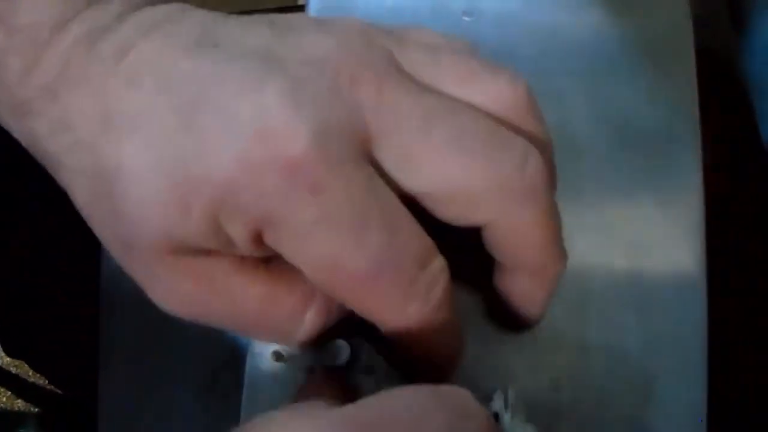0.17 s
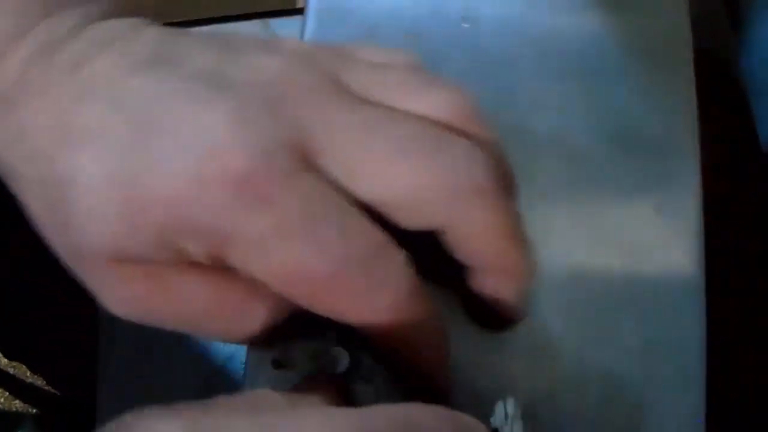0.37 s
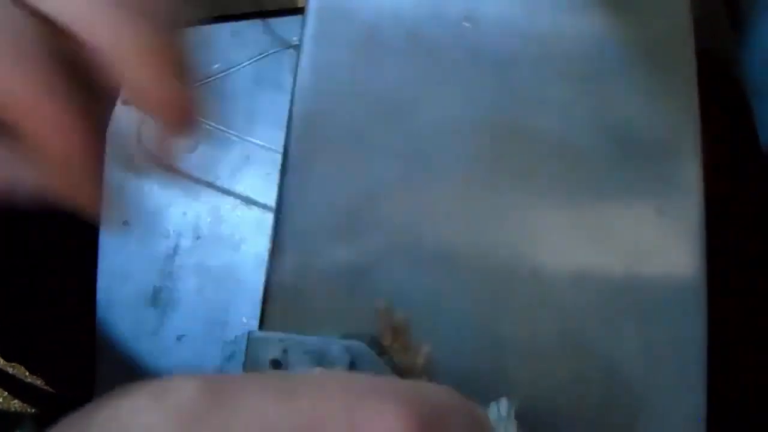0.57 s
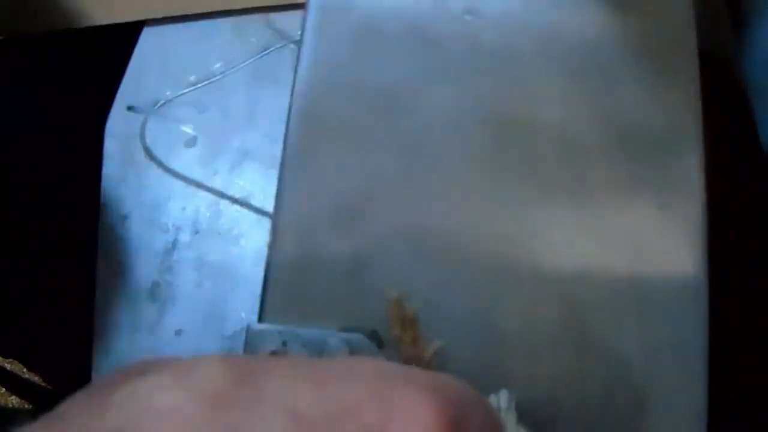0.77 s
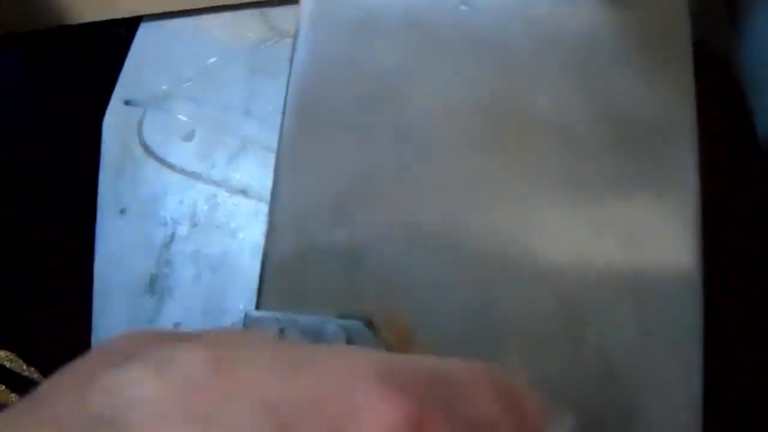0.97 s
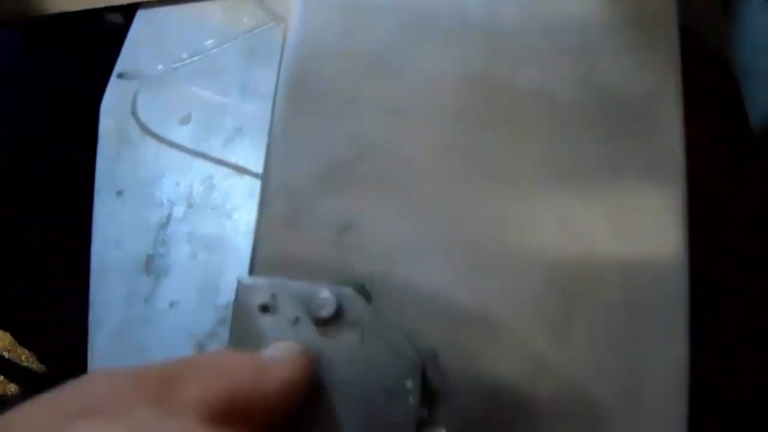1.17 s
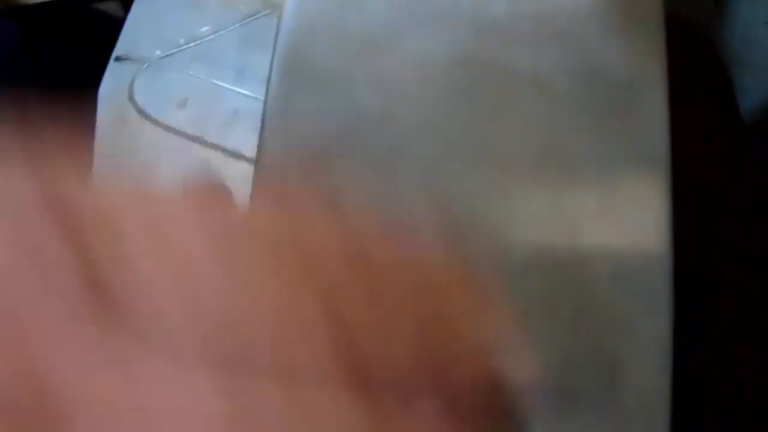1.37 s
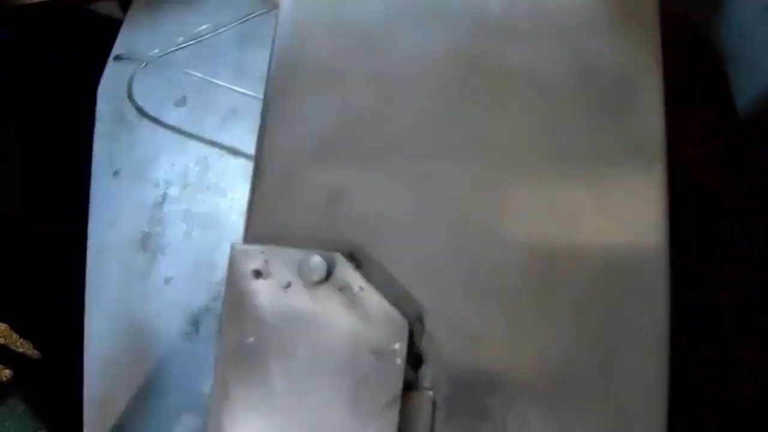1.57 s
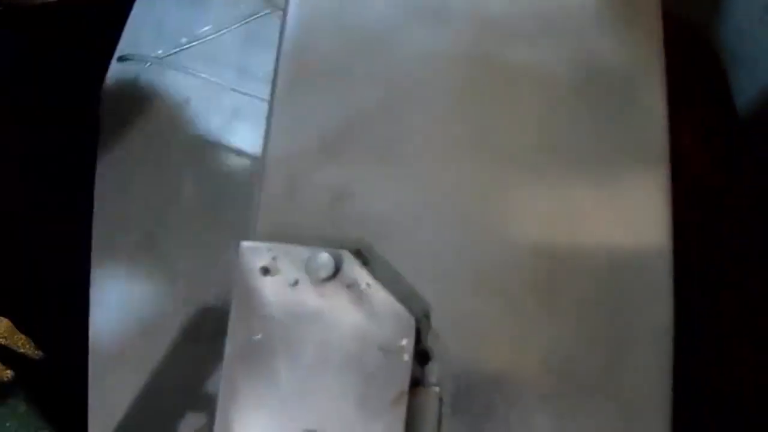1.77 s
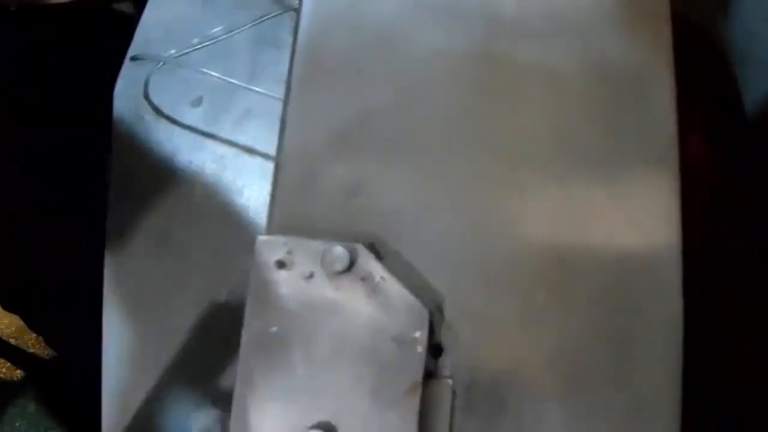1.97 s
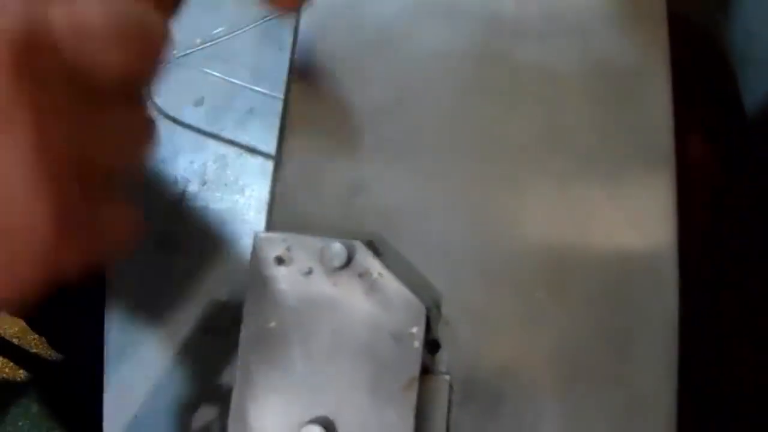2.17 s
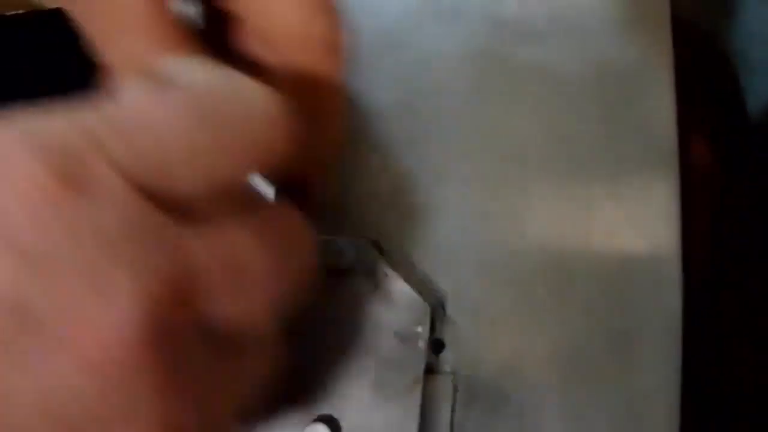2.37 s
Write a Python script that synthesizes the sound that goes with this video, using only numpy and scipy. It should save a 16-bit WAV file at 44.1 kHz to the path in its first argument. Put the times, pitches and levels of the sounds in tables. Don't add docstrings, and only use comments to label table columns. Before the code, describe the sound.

Chicks peep throughout over faint room hum. A near chick gives a piercing peep at 0.2-0.3 s and arched ones around 0.6 and 0.95 s, as hands brush metal. A hard knock rings the sheet at 0.75 s, knuckles stutter at 1.03 s, and a dry crack lands at 1.33 s. Quick warbles follow at 1.6 s, a high peep at 1.9 s, then more warbling and a faint thump near 2.2 s.

```python
import sys
import numpy as np
from scipy import signal
from scipy.fft import rfft, irfft
from scipy.io import wavfile
from scipy.ndimage import uniform_filter1d

SR = 44100
rng = np.random.default_rng(int(sys.argv[2]) if len(sys.argv) > 2 else 0)


def to_wav(s):
    ch = np.atleast_2d(s).T
    pcm = np.round(np.clip(ch, -1, 1) * 32767)
    wavfile.write(sys.argv[1], SR, pcm.astype(np.int16))


def makeup_ratio(level_db):
    decades = np.asarray(level_db, float) / 20
    return 10 ** decades


N = 110250


def rms_one(x):
    return x / np.sqrt(np.mean(x ** 2) + 1e-20)


def drift(rate_hz):
    r = np.exp(-2 * np.pi * rate_hz / SR)
    return rms_one(signal.lfilter([1], [1, -2 * r, r * r], rng.standard_normal(N + SR))[SR:])


def ring(clicks, hz, t60):
    r, w = makeup_ratio(-60 / (t60 * SR)), 2 * np.pi * hz / SR
    return signal.lfilter([0, np.sin(w)], [1, -2 * r * np.cos(w), r * r], clicks + 1e-18)


def bandpass_or_high(x, edges_hz, kind):
    return signal.sosfilt(signal.butter(2, edges_hz, kind, fs=SR, output="sos"), x)


def add(out, s, x):
    i = int(s * SR)
    out[i:i + len(x)] += x[:N - i]


# frequency in Hz, noise level in dB per Hz.
AIR_COLOUR = [(15, -37), (25, -5), (148, -0.5), (198, -12), (253, -7), (1530, -16), (3630, -14.5),
              (9550, -16), (15500, -20.5)]


def air():
    bin_hz, t = np.arange(N // 2 + 1) * SR / N + 1, np.arange(N) / SR
    colour_hz, colour_db = np.transpose(AIR_COLOUR)
    colour = makeup_ratio(np.interp(np.log(bin_hz), np.log(colour_hz), colour_db))
    noise = rms_one(irfft(rfft(rng.standard_normal(N)) * colour, N))
    rumble = rms_one(ring(rng.standard_normal(N), 43.3, 0.1))
    hum = makeup_ratio(-51 + 2.0 * drift(5.7)) * np.sin(2 * np.pi * 202.1 * t + .5 * drift(5.4))
    whine = rms_one(ring(rng.standard_normal(N), 1985, 0.36))
    return makeup_ratio(-47 + 2 * drift(11.0)) * noise + makeup_ratio(-53.5) * rumble + np.sqrt(2) * hum + makeup_ratio(-63.5) * whine


def echoes(x, t60, gap_s):
    t = np.arange(SR // 2) / SR
    tail = signal.lfilter([1], [1, -.55], rng.standard_normal(len(t)))
    tail = tail * makeup_ratio(-60 * t / t60) * (t > gap_s)
    return signal.fftconvolve(x, tail / np.sqrt(np.sum(tail ** 2)))[:N]


def whistle(hz, db, octave_db, twelfth_db, slack_db_per_khz=14):
    phase = 2 * np.pi * np.cumsum(hz) / SR
    flicker = np.repeat(rng.standard_normal(len(hz) // 400 + 1), 400)[:len(hz)]
    slack_khz = np.clip((4300 - hz) / 1000, 0, 1)
    slack_db = 6 * uniform_filter1d(flicker, size=300) + slack_db_per_khz * slack_khz
    octave = makeup_ratio(octave_db + slack_db) * np.sin(2 * phase)
    twelfth = makeup_ratio(twelfth_db + slack_db) * np.sin(3 * phase)
    i = np.arange(len(hz))
    soft_ends = np.minimum(1, np.minimum(i, i[::-1]) / (0.0044 * SR))
    return np.sqrt(2) * makeup_ratio(db) * (np.sin(phase) + octave + twelfth) * soft_ends


def gliding_notes(rows):
    out, flutter_db = np.zeros(N), 2.2 * drift(90)
    for s, length, from_hz, to_hz, db in rows:
        u = np.arange(int(length * SR)) / (length * SR)
        swell_db = 8 * np.log10(np.sin(np.pi * u ** 1.18) + 0.013)
        swell_db = swell_db + np.resize(flutter_db[int(s * SR):], len(u))
        pitch = from_hz + (to_hz - from_hz) * u ** 0.99
        add(out, s, whistle(pitch, db + swell_db, octave_db=-29, twelfth_db=-48))
    return out


def flock():
    rows = []
    for when, size, pitch, fall in rng.random(size=(170, 4)):
        from_hz = 4500 * (0.71 + 0.83 * pitch)
        to_hz = 4500 * (0.59 + 0.5 * pitch) * (1 - .35 * fall)
        rows.append((2.25 * when, .04 * (.5 + size), from_hz, to_hz, -60 + 8 * size))
    return gliding_notes(rows)


# start in seconds, length in seconds, pitch
# from in Hz, pitch to in Hz, level in dB.
SINGLE_NOTES = [(.37, 0.022, 3690, 2290, -37), (.42, 0.062, 4190, 2830, -43.5),
                (.552, 0.043, 4065, 4550, -44.5), (0.0, 0.029, 4615, 4270, -44.5),
                (.04, 0.14, 5200, 5120, -57), (1.022, 0.0076, 5280, 4460, -21),
                (1.065, 0.09, 4055, 3782, -48.5), (1.13, 0.034, 4300, 2920, -43),
                (1.18, 0.046, 4700, 4500, -61), (2.261, 0.013, 4137, 3850, -27.5),
                (2.19, 0.017, 5780, 6000, -42), (2.186, 0.018, 4670, 4445, -34),
                (1.231, 0.014, 5250, 5060, -47), (1.248, 0.029, 4770, 3027, -39),
                (1.365, 0.073, 4030, 4150, -50), (1.28, 0.046, 4880, 5390, -32.5),
                (1.336, 0.024, 3724, 4770, -35), (1.478, 0.085, 4147, 3864, -37.5),
                (1.495, 0.039, 5400, 5090, -44), (0.764, .026, 3950, 3650, -33),
                (1.535, 0.033, 3470, 2730, -39.5), (1.984, 0.013, 3530, 2780, -45),
                (1.775, 0.055, 5640, 5200, -44), (1.803, 0.052, 4395, 2820, -33.5),
                (1.85, 0.031, 3910, 3280, -42), (1.856, 0.019, 8160, 9210, -29),
                (1.96, 0.0074, 8200, 8200, -29), (2.02, 0.15, 4190, 2860, -54.5),
                (2.1, 0.023, 5300, 4890, -42), (2.118, 0.048, 4265, 2780, -35),
                (2.145, 0.0198, 3720, 3220, -35), (2.272, 0.051, 3903, 3710, -45),
                (2.478, 0.038, 4800, 6140, -44)]


def neighbours():
    return gliding_notes(SINGLE_NOTES)


# start in seconds, length in seconds, level in dB, low edge in Hz.
STROKES = [(0.0, 0.033, -38.5, 2480), (0.253, 0.13, -41.5, 600), (0.43, 0.18, -45.5, 7060),
           (0.095, 0.091, -46.5, 7000), (0.668, 0.13, -31.5, 775), (0.749, 0.008, -26, 1490),
           (0.763, 0.026, -38.5, 4960), (0.904, 0.01, -70, 1470), (1.03, 0.011, -31.5, 400),
           (1.046, 0.008, -30.5, 496), (1.054, 0.02, -35, 500), (1.3274, 0.0034, -24, 600),
           (1.336, 0.083, -33, 970), (1.405, 0.051, -37, 6030), (1.407, .02, -35, 7200),
           (1.158, 0.17, -45.5, 300), (0.929, 0.012, -32.5, 250), (0.95, 0.042, -43.5, 590),
           (1.549, 0.14, -38.5, 5260), (1.597, 0.087, -39.5, 495), (1.952, 0.0068, -30, 1230),
           (2.126, 0.087, -46.5, 493)]


def brushes():
    out = np.zeros(N)
    grains_per_s = 14000
    grains = rng.standard_normal(N) * makeup_ratio(3 * drift(72)) * (rng.random(N) < grains_per_s / SR)
    grains = grains + 0.54 * signal.lfilter(*signal.iirpeak(10000, 3.0, fs=SR), grains)
    for s, length, db, low_hz in STROKES:
        t = np.arange(int((length + 0.05) * SR)) / SR
        rub = bandpass_or_high(np.resize(grains[int(s * SR):], len(t)), [low_hz, 9900], "band")
        fade_db = -60 * t - 590 * np.maximum(t - length, 0)
        add(out, s, rms_one(rub) * np.minimum(1, t / 0.00043) * makeup_ratio(db + fade_db))
    return out


# start in seconds, level in dB, pitch in Hz.
KNUCKLE_BUMPS = [(1.0305, -22, 700), (1.0332, -10.5, 630), (1.039, -23, 424), (1.0463, -20.5, 314),
                 (1.052, -17, 500), (1.057, -29, 347), (1.066, -26, 256), (1.075, -26, 427),
                 (1.082, -35, 171), (1.092, -46, 150), (0.772, -11, 850), (0.8, -27, 302),
                 (0.818, -35, 253)]


def bumps():
    out, t = np.zeros(N), np.arange(SR // 10) / SR
    for s, db, hz in KNUCKLE_BUMPS:
        add(out, s, np.sin(2 * np.pi * hz * t) * makeup_ratio(db - 60 * t * hz / 6.8))
    return out


# frequency in Hz, level in dB, 60 dB decay in seconds.
SHEET_MODES = [(590, -20, 0.038), (850, -1.5, 0.039), (1294, -4, 0.02), (1950, -16, 0.019),
               (2670, 7, 0.015), (2730, 1, 0.017), (3684, -5.5, 0.066), (4500, -12, 0.018),
               (5400, -13, 0.056)]
# start in seconds, level in dB, ring in dB, thud in dB, thud pitch in Hz.
BLOWS = [
    (0.7526, -12.5, 2.5, -40, 500),
    (0.7556, -9.5, 1.5, -40, 500),
    (0.761, -20, -6, 16.5, 148.3),
    (1.048, -21.5, -12, 16.5, 200.4),
    (1.3302, -12, -33, -36, 175),
    (2.2, -40.5, -23, 23.5, 82),
]


def knocks():
    out, t = np.zeros(N), np.arange(SR // 2) / SR
    for s, db, ring_db, thud_db, thud_hz in BLOWS:
        touch = rng.standard_normal(len(t)) * makeup_ratio(-60 * t / .008) / 8
        sheet = sum(makeup_ratio(mode_db) * ring(touch, hz, t60) for hz, mode_db, t60 in SHEET_MODES)
        sheet = bandpass_or_high(sheet, 450, "high")
        crack = signal.lfilter([.3], [1, -.8], np.diff(rng.standard_normal(len(t) + 1)))
        crack = crack * makeup_ratio(-22 - 60 * t / 0.041)
        thud = np.sin(2 * np.pi * thud_hz * t) * makeup_ratio(-60 * t * thud_hz / 33)
        thud = thud * np.minimum(1, t * thud_hz / 3)
        add(out, s, makeup_ratio(db) * (makeup_ratio(ring_db + 1.5) * sheet + crack + makeup_ratio(thud_db - 21.5) * thud))
    return out


# time in seconds, pitch in Hz, level in dB.
RISING_PEEP = [(0.18, 4040, -28), (0.19, 4803, -32.5), (0.198, 4982, -26), (0.224, 5510, -26.5),
               (0.234, 4692, -4.5), (0.256, 5300, -15), (0.272, 4320, -3)]
FALLING_TAIL = [(.272, 4282, -45), (0.278, 3421, -11.5), (.284, 3402, -24), (.289, 4563, -13.5),
                (0.303, 4344, -19), (.308, 3360, -18.5), (0.317, 2746, -32.5), (0.327, 2890, -31.5),
                (0.338, 2910, -34)]
ARCHED_PEEP = [(.594, 4396, -31), (.604, 4720, -19), (0.619, 4958, -19), (.645, 5220, -20),
               (.655, 5167, -18.5), (0.665, 4558, -7.5), (0.668, 3597, -28), (0.681, 3335, -20),
               (0.69, 2880, -47)]
SECOND_ARCH = [(0.913, 4435, -49), (.925, 4905, -22), (.95, 5264, -31), (.978, 5430, -31.5),
               (.998, 5380, -28), (1.0035, 4835, -10), (1.006, 3663, -27.5), (1.019, 3496, -26),
               (1.032, 2950, -42)]
WARBLE = [(1.574, 4145, -39), (1.588, 5300, -43), (1.598, 4500, -22.5), (1.607, 3070, -35),
          (1.614, 4416, -23), (1.622, 5660, -41.5), (1.63, 5786, -32.5), (1.637, 4287, -21),
          (1.648, 3150, -24)]
WARBLE_ENDING = [(1.643, 3237, -22), (1.651, 3290, -28), (1.657, 4406, -25), (1.664, 5870, -42),
                 (1.672, 5950, -34.5), (1.681, 4160, -26.5), (1.693, 2710, -36.5), (1.70, 3550, -32),
                 (1.709, 4230, -25)]
HIGH_PEEP = [(1.845, 4403, -33), (1.858, 5626, -31), (1.876, 6000, -23.5), (1.888, 6131, -8),
             (1.905, 5945, -15), (1.936, 6078, -18.5), (1.952, 5400, -22.5), (1.974, 5490, -22.5),
             (1.99, 4520, -32.5)]
LAST_WARBLE = [(2.131, 3824, -43), (2.146, 5200, -38), (2.158, 5450, -33), (2.165, 4958, -25.5),
               (2.170, 4500, -20.5), (2.174, 4360, -32), (2.18, 4582, -11.5), (2.184, 4820, -29),
               (2.192, 5540, -39)]
LAST_FALL = [(2.204, 4805, -30), (2.211, 4000, -18.5), (2.215, 3950, -26), (2.219, 4000, -19),
             (2.227, 4300, -33.5), (2.234, 5700, -30.5), (2.25, 5900, -32), (2.256, 4000, -26),
             (2.27, 3100, -27.5)]
# octave in dB, twelfth in dB, overtone gain in dB per kHz as the
# pitch slackens, echo send in dB.
VOICE_COLOURS = [(-25.5, -54, 14, -1), (-25, -31.5, 16, -0.5), (-25, -34.5, 21.5, 1),
                 (-18.5, -32, 27, -2.5), (-11, -24, -5, 1.5), (-11.5, -15, -4, 0.5), (-13.5, -45, 14, -2.5),
                 (-18, -30, 14, 4), (-12, -24, -5, 1.5)]
PITCH_ROUNDING = [1, 1, 1, .7, 1.2, 1.2, 1, 1, 1]


def near_chick():
    out, send = np.zeros(N), np.zeros(N)
    waver, flutter_db = 1 + .003 * drift(158), 1.8 * drift(50)
    calls = [RISING_PEEP, FALLING_TAIL, ARCHED_PEEP, SECOND_ARCH, WARBLE, WARBLE_ENDING,
             HIGH_PEEP, LAST_WARBLE, LAST_FALL]
    for call, (*overtones, send_db), rounding in zip(calls, VOICE_COLOURS, PITCH_ROUNDING):
        s, hz, db = np.transpose(call)
        i = np.arange(int(s[0] * SR), int(s[-1] * SR))
        glide = max(1, int(rounding * .004 * SR))
        pitch = uniform_filter1d(np.interp(i / SR, s, hz), glide, mode="nearest")
        voice = whistle(pitch * waver[i], np.interp(i / SR, s, db) + flutter_db[i], *overtones)
        add(out, s[0], voice)
        add(send, s[0], makeup_ratio(send_db) * voice)
    return out, send


def scene():
    chick, chick_send = near_chick()
    hands = knocks() + bumps() + brushes()
    others = neighbours()
    send = chick_send + makeup_ratio(-11) * hands + makeup_ratio(6.5) * others
    box = makeup_ratio(-8) * echoes(send, t60=.04, gap_s=0.0028)
    room = echoes(makeup_ratio(-14) * send + flock(), t60=.35, gap_s=.012)
    return (chick + hands + makeup_ratio(-0.5) * others + box + room + air())[None]


def band_limit(x):
    return signal.sosfilt(signal.butter(12, 15880, fs=SR, output="sos"), x)


def record(dry):
    sensor_rate, out_rate = 160, 147
    sensor = signal.resample_poly(0.93 * np.tanh(dry / 0.99), sensor_rate, out_rate, axis=1)
    thinned = sensor[:, np.arange(N) * sensor_rate // out_rate]
    thinned = signal.sosfilt(signal.cheby2(12, 70, 16200, fs=SR, output="sos"), thinned)
    finished = bandpass_or_high(thinned, 36, "high")
    return band_limit(finished)


dry = scene()
out = record(dry)
to_wav(out)
```